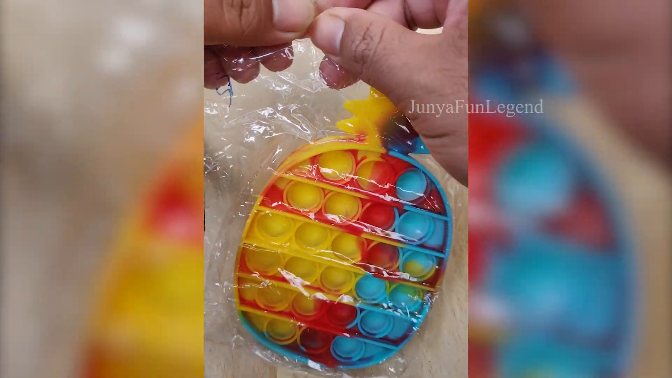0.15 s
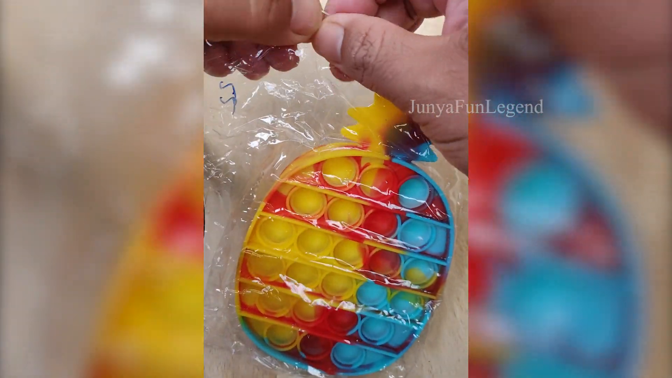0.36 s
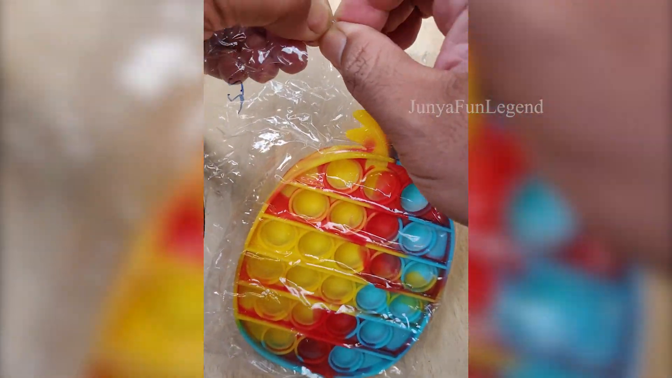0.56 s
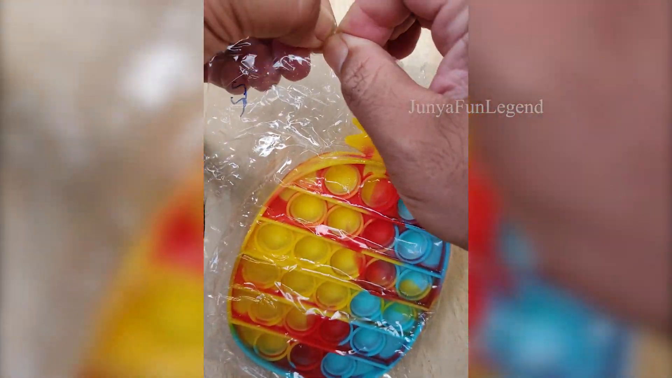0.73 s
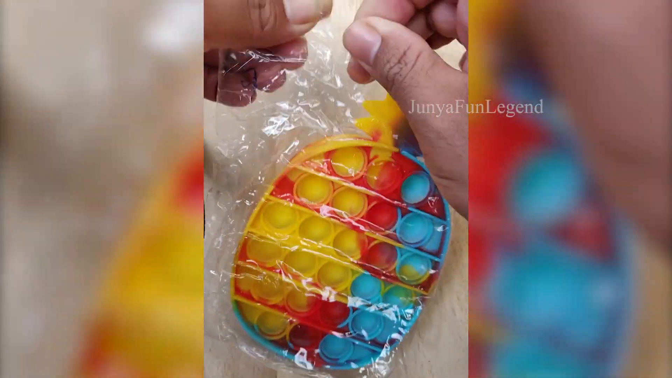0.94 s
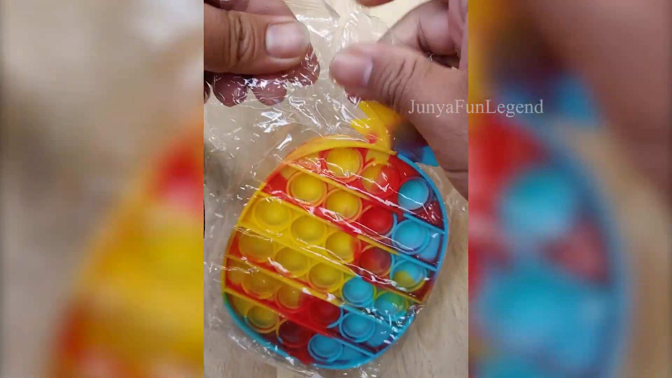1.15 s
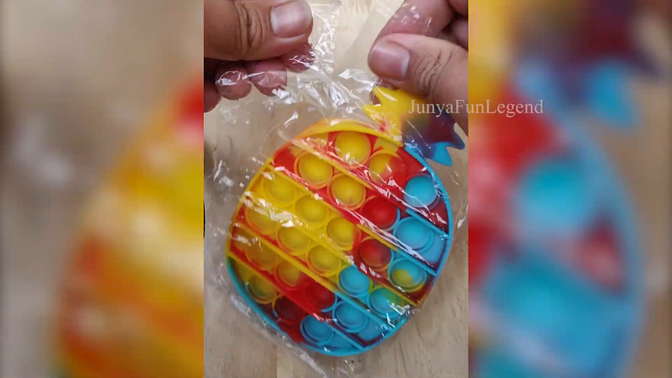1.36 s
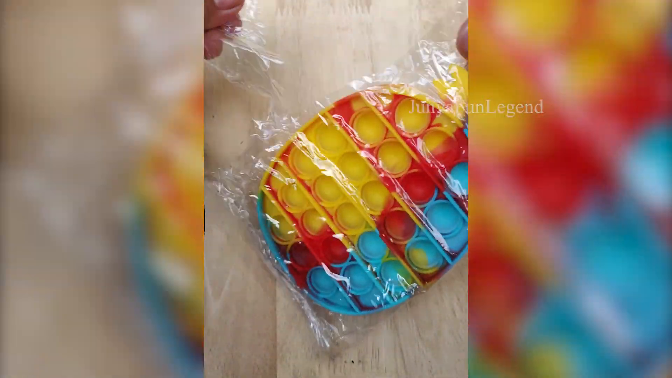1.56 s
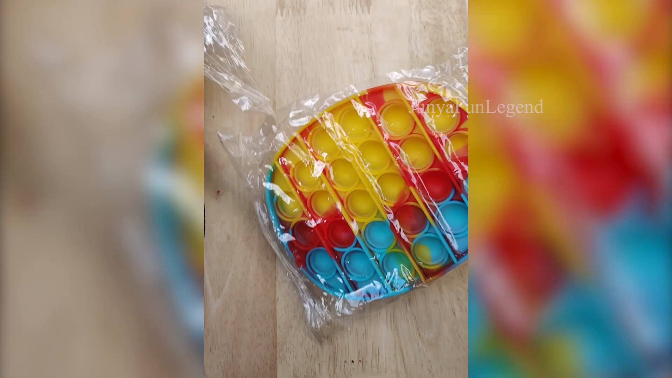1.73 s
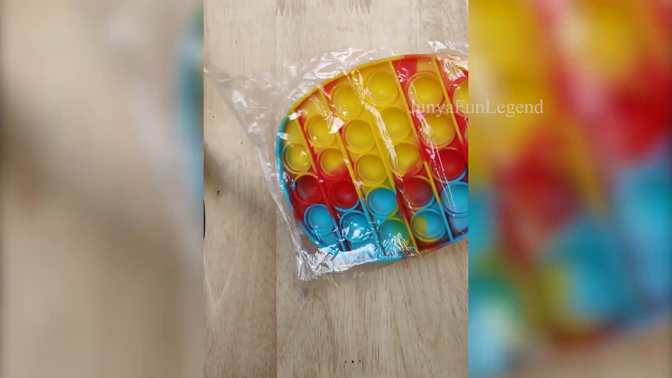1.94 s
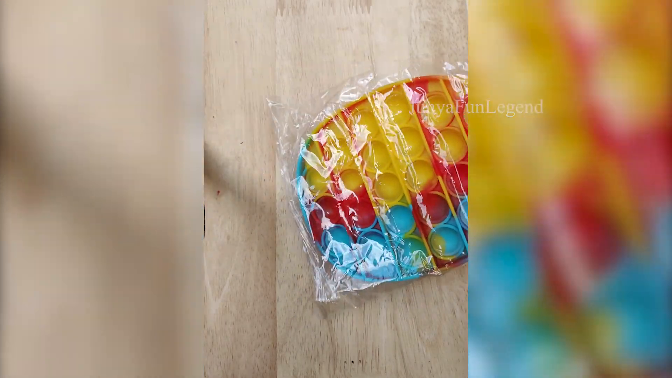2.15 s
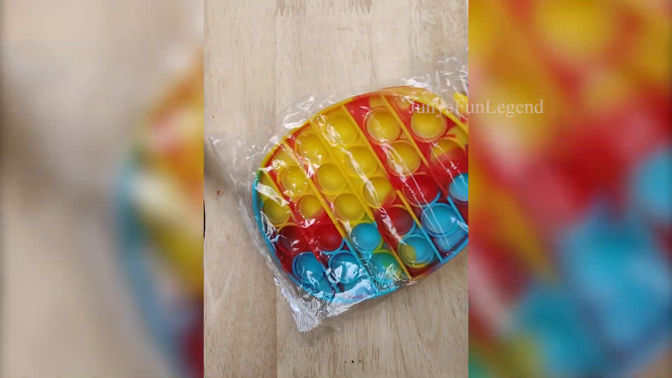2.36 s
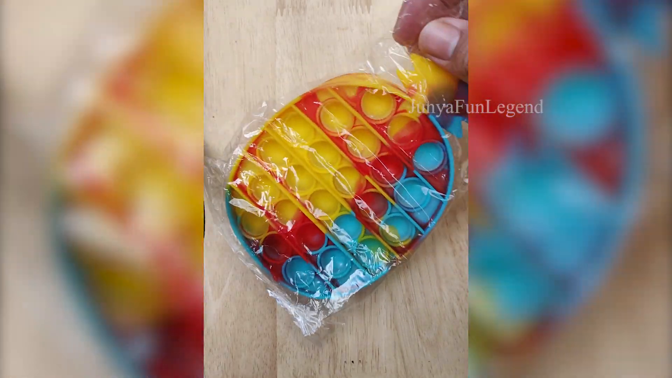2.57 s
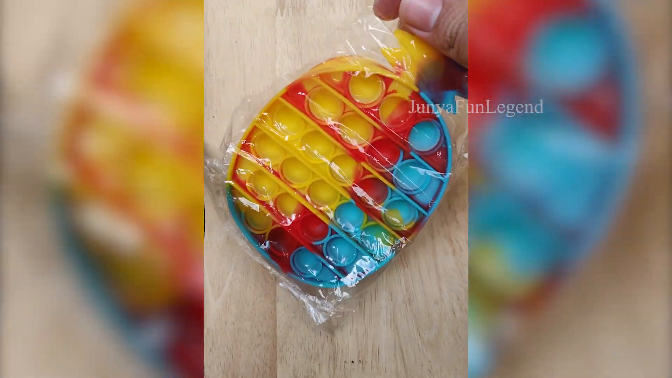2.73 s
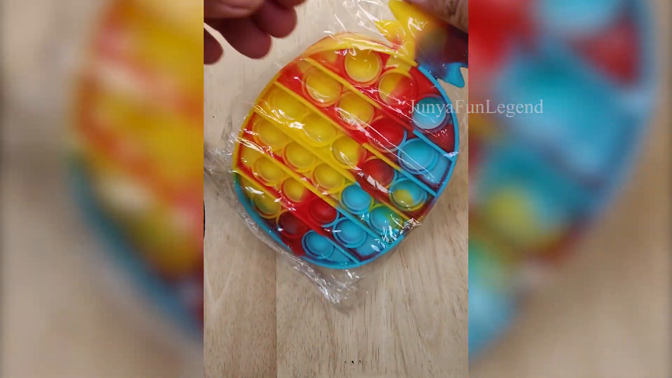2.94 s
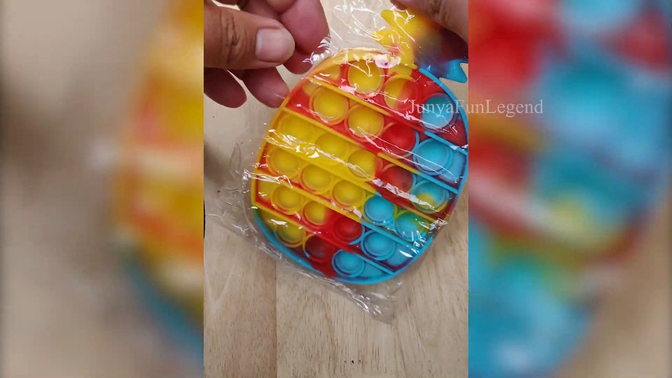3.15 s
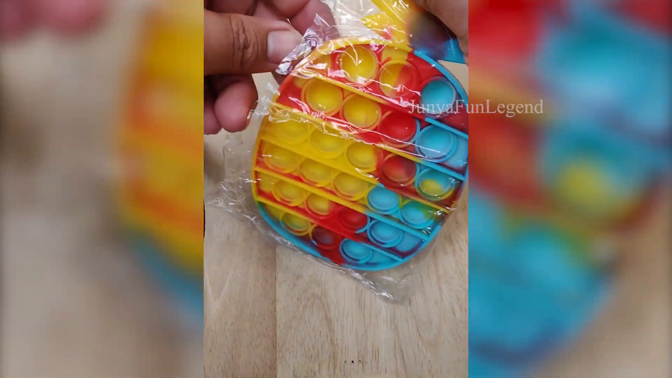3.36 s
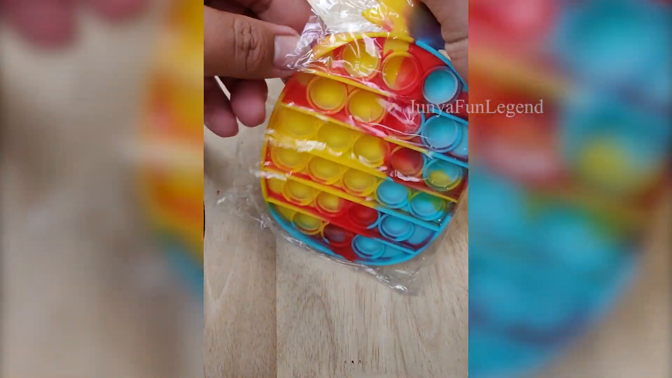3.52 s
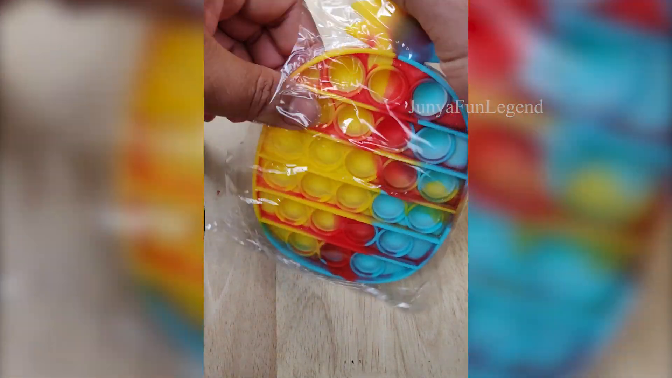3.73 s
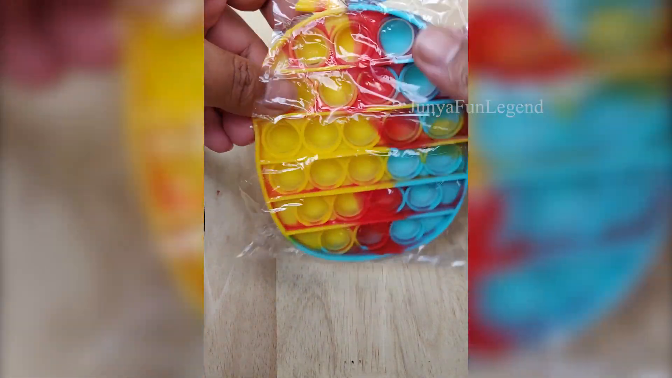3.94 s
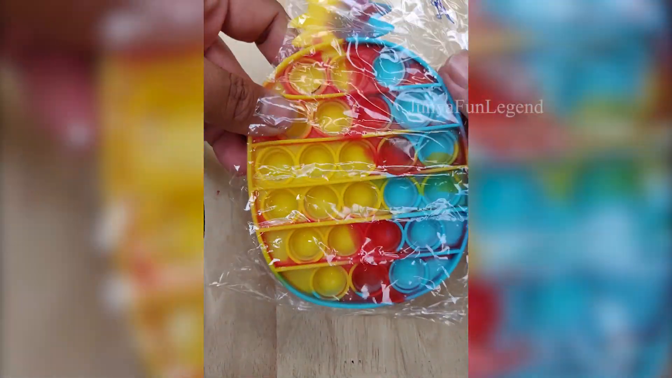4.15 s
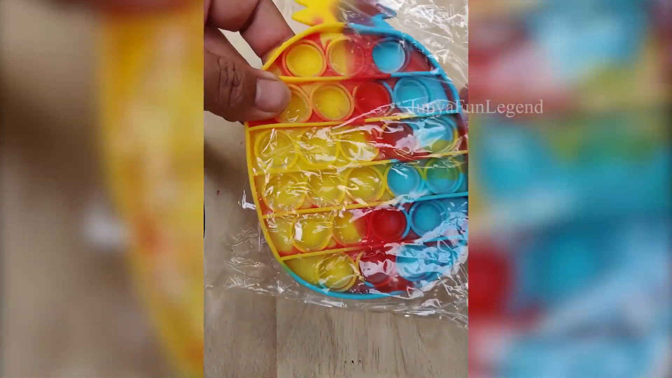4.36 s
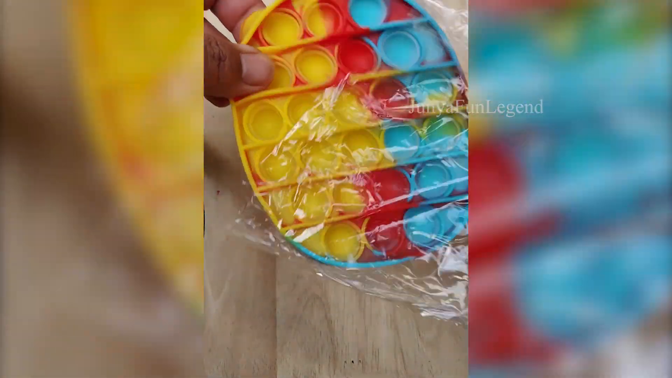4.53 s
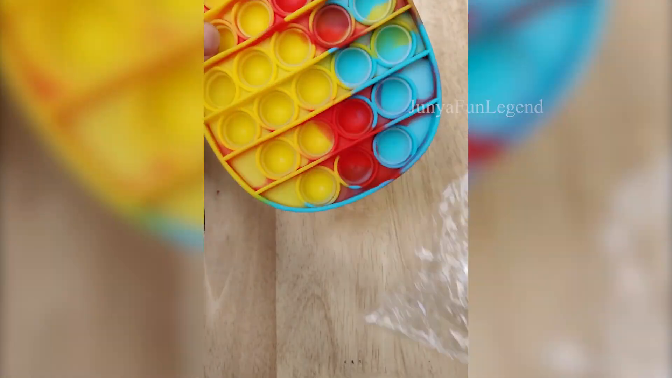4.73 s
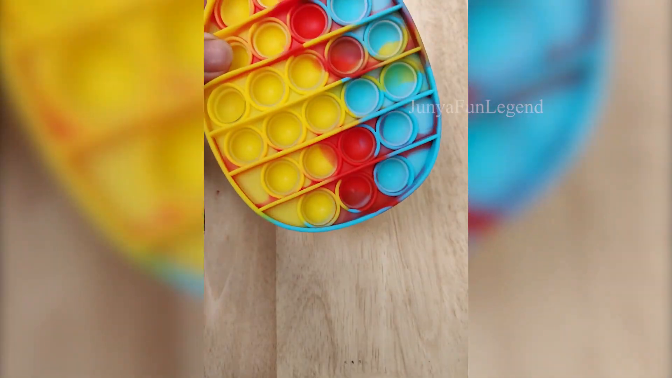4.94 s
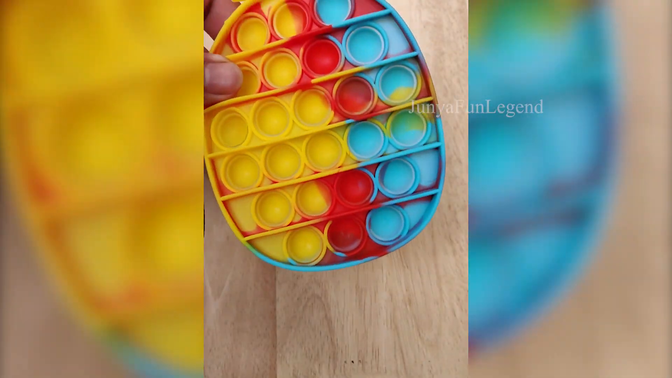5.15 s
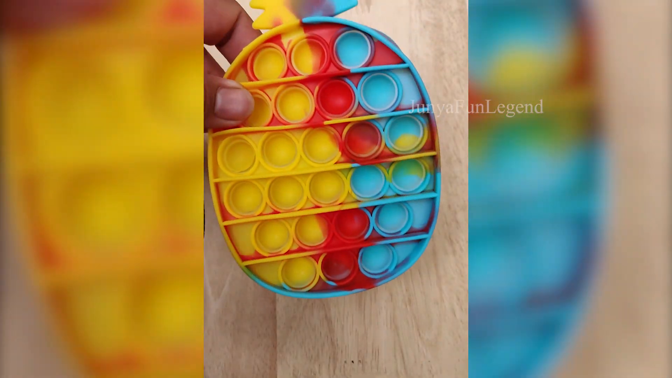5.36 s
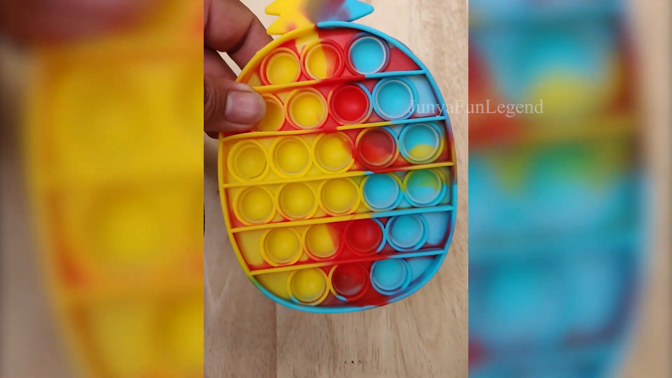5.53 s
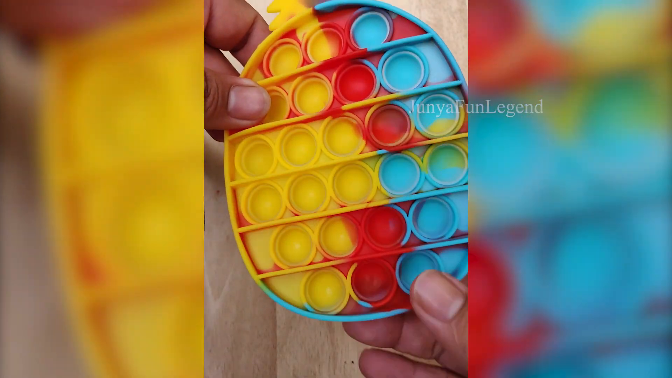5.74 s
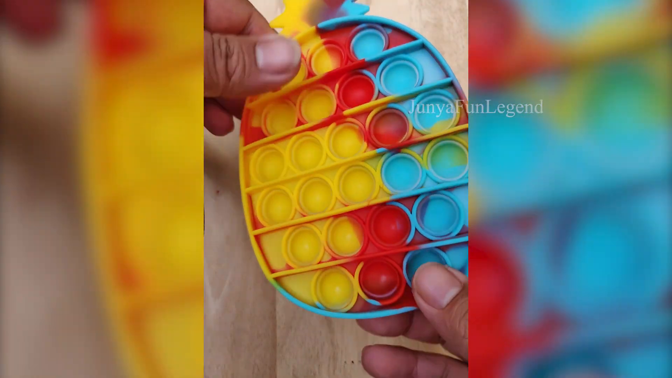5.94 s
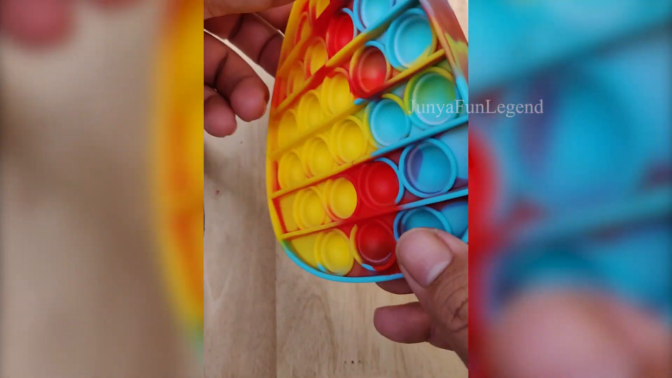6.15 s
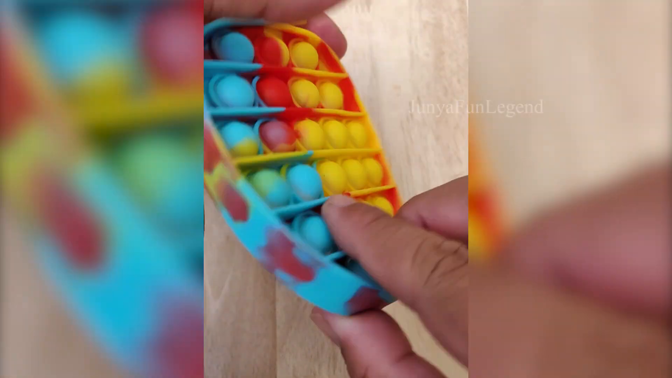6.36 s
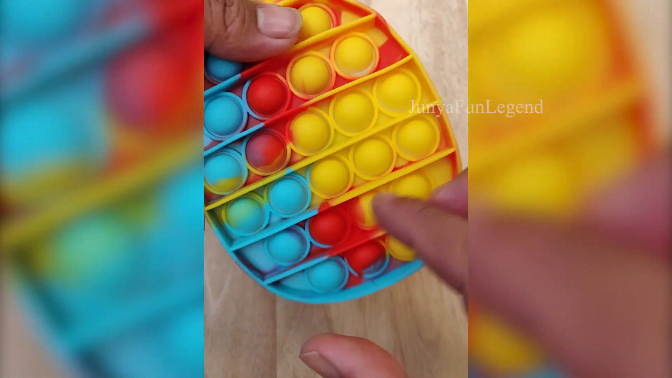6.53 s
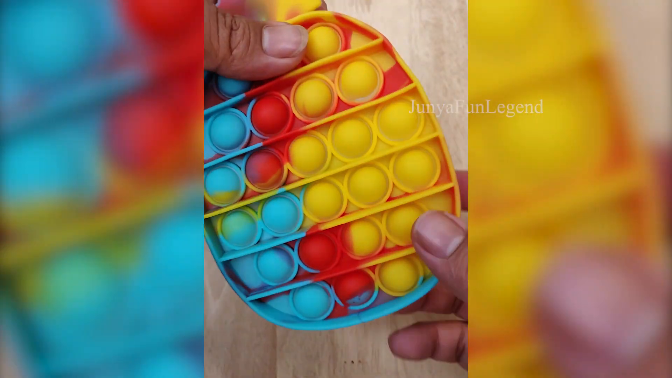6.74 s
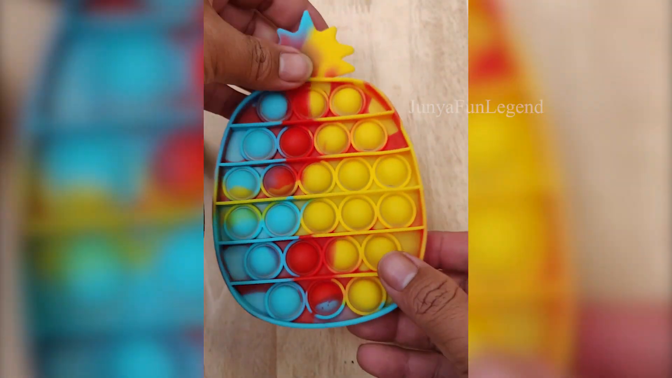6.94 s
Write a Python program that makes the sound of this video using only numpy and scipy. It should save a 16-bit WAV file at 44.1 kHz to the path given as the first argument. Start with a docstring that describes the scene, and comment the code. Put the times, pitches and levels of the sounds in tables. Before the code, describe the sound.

Close stereo pickup in a small, short-tailed room, over wavering low rumble, a barely audible hum and thin hiss. From 0 s thin plastic film snaps sharply, brightest in the first 0.3 s, then sparser until about 0.75 s. A low thud of the toy on the wooden table at 0.77 s starts a dense, loud crackle, peaking around 1.4 s and continuing to about 2 s. From 2.1 to 2.9 s the crinkles are lighter and scattered. A bump at 3.05 s brings renewed uneven bursts, with dull bumps near 3.6 s. Crackling swells from 4.2 to 4.7 s, with thuds around 4.5-4.65 s as the wrapper comes off, then drops to small crackles ending near 5.3 s. Afterwards, quiet: airy finger slides over silicone at 5.35-5.75 s and 6.2-6.8 s, faint hollow knocks and ticks around 5.83, 6.6 and 6.9 s.

```python
"""Hands crumple a thin plastic wrapper and pull it off a silicone bubble toy on a wooden table, close to a phone.
From the start a low rumble, a faint hum and a thin hiss, all shaped noise, lie under the scene; the film crackles
densely and buckles in sharp snaps, short noise bursts in three parts, and a small room answers with a diffuse tail.
Soon the toy bumps the table, a push of noise in a broad resonance; from about 5.3 s fingertips knock the hollow
bubbles in the same way, slide over the silicone in gliding bands of noise and tick on it in bursts like the snaps."""
import sys
import numpy as np
from scipy import signal
from scipy.fft import rfft, irfft
from scipy.io import wavfile
from scipy.ndimage import uniform_filter1d

SR = 44100
rng = np.random.default_rng(int(sys.argv[2]) if len(sys.argv) > 2 else 0)


def amp(db):
    return 10 ** (np.asarray(db, float) / 20)


def write(x):
    x = np.atleast_2d(x).T
    wavfile.write(sys.argv[1], SR, np.round(np.clip(x, -1, 1) * 32767).astype(np.int16))


N = 308259
TIME = np.arange(N) / SR

# the crisp, middle and hollow part of a buckle: (low edge [Hz], high edge [Hz], t60 [s],
# likeness of the two ports [0-1], lead of the left port [s])
BUCKLE_PARTS = [(3570, 14100, 0.0056, 0.03, 0.00058), (1740, 5060, 0.026, 0, 0.00024),
                (280, 2300, 0.018, 0.83, 0.00013)]
# where the hands work: (time [s], left minus right [dB])
HANDS_PAN = [(0, 4.5), (4.7, 6.5), (4.95, -3), (5.9, -4.5), (6.2, 2)]


def pan_gain(pan_db):
    """Left and right gain for a left-minus-right difference in dB, shared evenly."""
    return amp(np.array([pan_db, -pan_db]) / 2)


def points(table, hz):
    """Level in dB of a (frequency [Hz], level [dB]) table, straight on a log axis."""
    f, db = np.transpose(table)
    return np.interp(np.log(hz + 1), np.log(f), db)


def coloured(table):
    """Steady noise with the colour of a table, rms 1."""
    hz = np.arange(N // 2 + 1) * SR / N
    x = irfft(rfft(rng.standard_normal(N)) * amp(points(table, hz)), N)
    return x / x.std()


def walk(rate):
    """Random levels held 1 / rate seconds and slewed; spread 1."""
    hold = int(SR / rate)
    steps = np.repeat(rng.standard_normal(N // hold + 1), hold)
    x = uniform_filter1d(steps, hold)[:N]
    return x / x.std()


def band(x, hz, width):
    """One resonance."""
    return signal.lfilter(*signal.iirpeak(hz, hz / width, fs=SR), x)


def fade(t60, size=1024):
    """Exponential dying away, down 60 dB after t60 seconds."""
    return np.exp(-np.log(1000) * np.arange(size) / SR / t60)


def pair(shape, alike):
    """Two noises with a common share, one for each port."""
    alike = np.clip(alike, 0, 1)
    common, left, right = rng.standard_normal((*shape[:-1], 3, shape[-1])).swapaxes(0, -2)
    return np.sqrt(alike) * common + np.sqrt(1 - alike) * np.array([left, right])


def add(out, times, bursts):
    """Lay bursts (ports, events, samples) onto the track."""
    for k, s in enumerate(times):
        i = int(s * SR)
        out[:, i:i + bursts.shape[-1]] += bursts[:, k, :N - i]


def response(table, lo_hz, hi_hz, size=1024):
    """Causal (minimum-phase) response with the colour of a table inside a band, energy 1."""
    hz = np.arange(size // 2 + 1) * SR / size + 1
    edges = 1 / np.sqrt((1 + (lo_hz / hz) ** 8) * (1 + (hz / hi_hz) ** 8))
    cepstrum = irfft(np.log(amp(points(table, hz)) * edges))
    # folding the cepstrum forward in time makes the response causal
    cepstrum[1:size // 2] *= 2
    cepstrum[size // 2 + 1:] = 0
    taps = irfft(np.exp(rfft(cepstrum)))[:size // 2]
    return taps / np.sqrt(np.sum(taps ** 2))


def ports(x, lo_hz, hi_hz, lead_s):
    """Each microphone port colours the sound in its own way, the right one hears it later."""
    # colour of a buckle at each port: (frequency [Hz], relative level [dB])
    left_colour = [(150, -18.5), (330, -22), (780, -12), (1900, -15), (3300, -14.5), (4700, -10),
                   (6000, 0.5), (7400, -11.5), (8700, -26), (9400, -31), (10400, -57), (12000, -34),
                   (15600, -25)]
    right_colour = [(150, -6.5), (330, -32), (780, -11), (1900, -19.5), (3300, -18.5), (4700, -16.5),
                    (6000, -12.5), (7400, -14), (8700, -7), (9400, -10), (10400, -32), (12000, -27.5),
                    (15600, -15)]
    wait = np.zeros(round(lead_s * SR))
    early = np.r_[response(left_colour, lo_hz, hi_hz), wait]
    late = np.r_[wait, response(right_colour, lo_hz, hi_hz)]
    taps = np.array([early, late]).reshape(2, *[1] * (x.ndim - 2), -1)
    return signal.fftconvolve(x, taps, axes=-1)[..., :x.shape[-1]]


def pulse(t60, rise_s=.00015):
    """Power of one buckle: a quick rise, then dying away."""
    return (fade(t60) * (1 - np.exp(-np.arange(1024) / SR / rise_s))) ** 2


def crease(x, lo_hz, hi_hz, lift_db=9.5, spread_octaves=.3):
    """Every crease has its own size and lifts one resonance of its own."""
    hz = np.arange(x.shape[-1] // 2 + 1) * SR / x.shape[-1] + 1
    centre = lo_hz * (hi_hz / lo_hz) ** rng.random((x.shape[-2], 1))
    octaves = np.log2(hz / centre)
    return irfft(rfft(x) * amp(lift_db * np.exp(-(octaves / spread_octaves) ** 2)))


def buckles(table, size=4096, count=256):
    """Milliseconds of noise: a faint short noise swells in just before, a dying run of smaller ones follows."""
    swell_in_db, swell_in_s = -20, .003
    run_db, run_per_s = -9, 600
    scatter_db, spread_floor = 8.5, .2
    pan_scatter_db, crease_top_hz = 3, 8000

    s, peak_db, middle_db, hollow_db, run_t60 = np.transpose(table)
    pan_db = np.interp(s, *np.transpose(HANDS_PAN)) + pan_scatter_db * rng.standard_normal(len(s))
    share = pan_gain(pan_db)
    share /= np.sqrt(np.mean(share ** 2, axis=0))

    # sizes sample by sample, with the main buckle at sample number count
    when, spread = rng.random((len(s), 2, size)).swapaxes(0, 1)
    before = amp(swell_in_db) * np.exp(np.arange(-count, 0) / SR / swell_in_s) * np.ones((len(s), 1))
    after = amp(run_db) * fade(run_t60[:, None], size=size - count)
    scatter = amp(-scatter_db * np.log(spread + spread_floor))
    sizes = (when < run_per_s / SR) * scatter * np.c_[before, after]
    sizes[:, count] = 1

    out = np.zeros((2, N))
    for (lo, hi, t60, alike, lead), db in zip(BUCKLE_PARTS, (peak_db, middle_db, hollow_db)):
        swell = np.sqrt(np.abs(signal.fftconvolve(sizes ** 2, pulse(t60)[None])[:, :size]))
        noise = crease(pair(sizes.shape, alike), lo, min(hi, crease_top_hz))
        bursts = ports(noise * swell, lo, hi, lead)
        # the main buckle sets the peak
        bursts /= np.abs(bursts[..., count:count + round(t60 * SR)]).max(axis=-1, keepdims=True)
        add(out, np.maximum(s - count / SR, 0), bursts * (amp(db) * share)[..., None])
    return out


def blows(table, breadth, rise_s, pan_db, size=8192):
    """A soft push: a short swell of noise in one resonance, as broad as breadth times its frequency."""
    s, db, hz, t60 = np.transpose(table)
    noise = pair((len(s), size), .8)
    rings = [band(band(noise[:, k], f, breadth * f), f, breadth * f) for k, f in enumerate(hz)]
    ring = np.stack(rings, axis=1)
    ring *= fade(t60[:, None], size=size) * (1 - np.exp(-np.arange(size) / SR / rise_s))
    ring *= amp(db)[:, None] / np.abs(ring).max(axis=(0, 2), keepdims=True)
    out = np.zeros((2, N))
    add(out, s, ring * pan_gain(pan_db)[:, None, None])
    return out


def rumble():
    """Low noise of wavering level, partly common to both ports."""
    # colour of the rumble: (frequency [Hz], relative level [dB])
    rumble_colour = [(12, -28.5), (20, 0), (60, -4.5), (121, -19), (163, -39), (274, -29.5), (353, -45.5),
                     (416, -25.5), (544, -76.5), (700, -51.5), (910, -56), (2200, -61), (3000, -120)]
    # its course: (time [s], level of the common share [dB], left minus right [dB])
    rumble_course = [(0.0, -49.5, 1), (0.68, -49, 10.5), (1.21, -55.5, 11.5), (1.36, -55.5, 19),
                     (1.87, -51.5, -1), (2.82, -52, -0.5), (3.0, -53.5, 3.5), (3.87, -49, 2.5),
                     (5.45, -54.5, -0.5), (6.99, -53.5, 1.5)]
    s, db, pan_db = np.transpose(rumble_course)
    db, pan_db = np.interp(TIME, s, db), np.interp(TIME, s, pan_db)
    # the more one-sided the rumble, the less alike at the two ports
    own = .2 + 0.12 * np.abs(pan_db)
    sides = np.array([coloured(rumble_colour), coloured(rumble_colour)])
    return (coloured(rumble_colour) + own * sides) * amp(db) * pan_gain(pan_db)


def hum():
    """A faint hum: noise through the same narrow resonance twice, equal at both ports."""
    hz, width_hz, level_db = 424, 40, -90.5
    x = band(band(rng.standard_normal(N), hz, width_hz), hz, width_hz)
    return x / x.std() * amp(level_db)


def hiss(count=24):
    """A thin hiss, built of narrow noise bands with random levels."""
    # colour of the hiss, band by band: (frequency [Hz], relative level [dB])
    hiss_colour = [(1500, -38.5), (3500, -13), (5500, -3), (7000, -1), (9500, -11), (12000, -21),
                   (15500, -28)]
    # weight of each port, before the bass is cut: (left [dB], right [dB])
    hiss_sides = (-65.5, -60)
    out = 0
    for hz in np.geomspace(2300, 15000, count):
        bands = band(band(rng.standard_normal((2, N)), hz, .09 * hz), hz, .09 * hz)
        random_db = 1.8 * np.array([walk(18.0), walk(11.0)])
        out = out + bands * amp(points(hiss_colour, hz) + random_db)
    return out / out.std() * amp(np.array(hiss_sides))[:, None]


def crumple(count=4):
    """Countless small buckles of very unequal size: sparse and bunched at rest, dense when the hands pull."""
    # pull of the hands on the film: (time [s], crisp crackle [dB], hollow part re crackle [dB])
    pull = [(0, -24.5, -9.5), (.1, -42, -6), (0.502, -43, -18.5), (.75, -53, -11), (0.801, -23.5, -6),
            (0.901, -19.5, -12), (1.13, -29, -6.5), (1.429, -12, -12.5), (1.619, -21, -16.5),
            (1.892, -27.5, -27), (2.029, -19.5, -8), (2.09, -40.5, -12), (2.2, -39, -16), (2.3, -31.5, -10),
            (2.701, -43.5, -23.5), (2.969, -42.5, -33), (3.048, -21.5, -3), (3.172, -45.5, -7.5),
            (3.318, -23, -8), (3.468, -34, -11.5), (3.73, -21, -12.5), (3.9, -38.5, -9), (4.02, -32, -13.5),
            (4.209, -24.5, -22.5), (4.38, -16.5, -10), (4.54, -13, -7), (4.66, -20.5, -12),
            (4.721, -55.5, -21.5), (4.859, -30, -15), (5.128, -35.5, -28), (5.261, -58.5, -10),
            (5.34, -87, 2.5)]
    calm_per_s, busy_per_s = 210.0, 1100.0
    bunching_db, scatter_db, colour_db = 2.5, 3.5, 8.0

    s, crisp_db, hollow_db = np.transpose(pull)
    middle_db = 0.74 * crisp_db - 9.5 + 0.24 * hollow_db
    columns = crisp_db, middle_db, crisp_db + hollow_db
    effort = np.clip((np.interp(TIME, s, crisp_db) + 48) / 28, 0, 1)
    per_s = calm_per_s * (busy_per_s / calm_per_s) ** effort
    bunching = bunching_db * (1 - 0.39 * effort) * walk(45.)
    scatter = -scatter_db * np.log(rng.random(N) + 0.094)
    # the root keeps the power from growing with the density
    sizes = (rng.random(N) < per_s / SR) * amp(bunching + scatter) * np.sqrt(SR / per_s)

    out = 0
    for (lo, hi, t60, alike, lead), db in zip(BUCKLE_PARTS, columns):
        part = 0
        # creases differ in size, so each buckle favours other resonances, and neighbours in time are akin
        for hz in np.geomspace(lo, hi, count + 2)[1:-1]:
            favour = 0.53 * rng.standard_normal(N) + 0.38 * walk(30.)
            own = sizes * amp(colour_db * favour)
            swell = np.sqrt(np.abs(signal.fftconvolve(own ** 2, pulse(t60))[:N]))
            part = part + band(pair((N,), alike) * swell, hz, 0.73 * hz)
        part = ports(part, lo, hi, lead)
        # silent after the last row of the table
        out = out + part / part.std() * amp(np.interp(TIME, s, db, right=-150))
    return out * pan_gain(np.interp(TIME, *np.transpose(HANDS_PAN)))


def snaps():
    """The clearest single buckles of the film, each with its run of smaller ones."""
    # peaks before panning: (time [s], crisp part [dB], middle part [dB], hollow part [dB],
    # t60 of the run of smaller buckles that follows [s])
    film_snaps = [(0.0054, -10, -23, -27.5, 0.035), (0.023, -8, -14, -26, 0.099),
                  (0.0418, 1, -18, -14.5, 0.073), (0.0668, -3, -18, -29, 0.026),
                  (0.076, -8, -14, -17.5, 0.019), (0.114, -22, -33, -54, 0.035),
                  (0.1438, -2, -18.5, -31.5, 0.018), (0.1587, -14, -38, -31, 0.035),
                  (0.176, -14, -36, -32, 0.025), (0.1983, -2, -22, -29.5, 0.016),
                  (0.227, -15, -37, -56, 0.018), (0.2577, -9, -24, -39, 0.027),
                  (0.2909, -13.5, -31, -61, 0.035), (0.3237, -21, -41, -56, 0.014),
                  (0.3451, -13, -21, -41, 0.053), (0.3562, -6, -21.5, -59, 0.016),
                  (0.4, -21, -36, -63, 0.054), (0.4083, -11.5, -29, -61, 0.087),
                  (0.4815, -4, -14, -21.5, 0.022), (0.4984, -30.5, -35, -26, 0.012),
                  (0.538, -8, -22, -46, 0.013), (0.5674, -17, -46, -57, 0.035),
                  (0.601, -24.5, -40, -64, 0.035), (0.622, -15, -37, -50, 0.11),
                  (0.6579, -10.5, -26, -39.5, 0.035), (0.6682, -15, -17.5, -26, 0.11),
                  (0.7174, -6.5, -50, -32, 0.013), (0.7657, -1.5, -14, -5.5, 0.023),
                  (0.7825, -3.5, -34, -42, 0.027), (0.8099, -1.5, -34, -28, 0.041),
                  (0.823, -10, -15, -15.5, 0.035), (0.836, -1, -23, -22, 0.065),
                  (0.8462, 0, -36.5, -30.5, 0.084), (0.8779, -6.5, -23, -34.5, 0.022),
                  (0.9032, -4, -5.5, -14.5, 0.058), (0.9184, -2.5, -5.5, -21, 0.11),
                  (0.947, -4, -29, -40, 0.017), (0.9964, -6, -33, -38, 0.032),
                  (1.0113, -3.5, -40, -12.5, 0.022), (1.0447, -5, -31, -54, 0.096),
                  (1.0539, 3.5, -18, -26, 0.089), (1.0711, 5.5, -20, -25, 0.041),
                  (1.0824, -2, -24, -9.5, 0.035), (1.103, 1, -34, -42, 0.013),
                  (1.1377, -8.5, -23, -30, 0.03), (1.1452, 1.5, -33, -41, 0.026),
                  (1.1635, -9.5, -33, -26, 0.048), (1.2055, -3.5, -12, -16.5, 0.11),
                  (1.2596, 0, -33, -26.5, 0.042), (1.2683, -9, -33, -12, 0.037),
                  (1.285, -6.5, -39, -32, 0.061), (1.294, -12, -34.5, -23, 0.035),
                  (1.3733, -0.5, -22, -12, 0.063), (1.4023, 0.5, -31.5, -17.5, 0.035),
                  (1.604, 2.5, -18, -14, 0.045), (1.6364, -5.5, -25, -23, 0.026),
                  (1.7073, -8, -37, -50, 0.097), (1.7483, -1, -40, -47, 0.035),
                  (1.8028, -4, -20, -37, 0.021), (1.8148, -2.5, -32, -32, 0.02),
                  (1.8482, -16, -13.5, -48, 0.017), (1.8845, -3.5, -24, -43, 0.035),
                  (1.9072, -4.5, -27, -40, 0.11), (1.943, -6.5, -15.5, -21, 0.072),
                  (1.9727, -9.5, -22, -44, 0.1), (1.9913, -6.5, -36, -50, 0.084),
                  (2.0088, -5, -31, -31, 0.035), (2.0195, 0.5, -27, -36, 0.035),
                  (2.0695, -13, -21, -31, 0.035), (2.1276, -14.5, -44, -31.5, 0.043),
                  (2.145, -25, -21, -27.5, 0.035), (2.17, -7.5, -45, -55, 0.018),
                  (2.2298, -9.5, -31, -30.5, 0.06), (2.2404, -24, -26.5, -36, 0.035),
                  (2.2826, -8, -25, -34, 0.086), (2.3573, -20, -29, -25.5, 0.032),
                  (2.369, -14, -13, -47, 0.02), (2.3871, -19.5, -17, -33, 0.023),
                  (2.4104, -9.5, -23, -41, 0.046), (2.4327, -13.5, -29, -34, 0.11),
                  (2.4908, -15, -35, -45, 0.035), (2.575, -5, -21, -60, 0.03),
                  (2.591, -18, -26, -64, 0.035), (2.6177, -6.5, -19, -30, 0.022),
                  (2.673, -15, -24.5, -47, 0.057), (2.7357, -13, -19, -32, 0.067),
                  (2.786, -3, -26, -30.5, 0.042), (2.8243, -6.5, -15, -24, 0.033),
                  (2.883, -14, -30, -43, 0.065), (2.9452, -6, -51, -70, 0.024),
                  (2.9642, -19, -34, -66, 0.047), (3.0089, -5.5, -11, -44, 0.035),
                  (3.0265, -13, -7.5, -14.5, 0.1), (3.0348, -10, -5.5, -15, 0.1),
                  (3.0507, -1, -47, -44, 0.035), (3.076, -19.5, -18, -42.5, 0.026),
                  (3.101, -7, -34, -38, 0.05), (3.1436, -12, -29, -34, 0.035),
                  (3.1813, -5.5, -25, -37, 0.033), (3.236, -7, -24, -33, 0.056),
                  (3.259, -8.5, -20, -34, 0.035), (3.3344, -4.5, -10.5, -26, 0.03),
                  (3.4014, -4.5, -31, -57, 0.043), (3.4134, -8.5, -35, -48, 0.03),
                  (3.4366, -8.5, -21, -49, 0.08), (3.4458, -3, -12.5, -26, 0.058),
                  (3.4955, -7.5, -27, -36, 0.086), (3.5245, -8.5, -18, -28, 0.074),
                  (3.5591, 0.5, -5.5, -19.5, 0.071), (3.573, -12, -34, -31, 0.044),
                  (3.6093, -8.5, -19, -36, 0.04), (3.6436, -8, -26, -27, 0.021),
                  (3.6624, -0.5, -15, -18.5, 0.037), (3.6907, -1.5, -24, -37, 0.025),
                  (3.7504, -3, -7, -22, 0.03), (3.7854, -3.5, -14, -16.5, 0.11),
                  (3.846, -5, -32, -21, 0.013), (3.87, -2.5, -33, -47, 0.014),
                  (3.903, -3, -13.5, -26, 0.012), (3.9174, -5, -28, -37, 0.012),
                  (3.937, 0, -20, -24.5, 0.013), (3.9936, -1, -10.5, -17, 0.11),
                  (4.028, -4, -16, -33, 0.066), (4.0537, -12, -34.5, -46, 0.035),
                  (4.0689, -4.5, -10.5, -44, 0.051), (4.1229, -2.5, -30, -24, 0.035),
                  (4.1375, 1, -17, -15.5, 0.1), (4.15, -5.5, -29, -42, 0.035),
                  (4.2158, -24, -43.5, -47, 0.031), (4.2388, 0, -29, -22, 0.052),
                  (4.2524, -6, -8.5, -12.5, 0.061), (4.2788, -1, -22, -13.5, 0.035),
                  (4.2996, 0.5, -3, -30, 0.11), (4.3864, -4, -21, -14, 0.092),
                  (4.5003, -3, -33, -27, 0.035), (4.5894, -11, -24.5, -11, 0.051),
                  (4.616, -8, -26, -25, 0.035), (4.6715, -3, -7, -15.5, 0.025),
                  (4.6992, 1, -13.5, -39, 0.018), (4.7431, -18, -24, -58, 0.031),
                  (4.793, -17, -19.5, -49, 0.029), (4.8189, -21, -37, -51, 0.035),
                  (4.8349, -11.5, -30, -30, 0.03), (4.8628, -12.5, -42, -42, 0.027),
                  (4.9602, -9, -41, -22.5, 0.026), (5.0055, -15, -41, -30, 0.035),
                  (5.015, -8.5, -28.5, -37, 0.035), (5.0764, -15.5, -44, -47, 0.018),
                  (5.1084, -14.5, -38, -53, 0.029), (5.1723, -16.5, -48, -40, 0.078),
                  (5.2226, -15.5, -43, -62, 0.0355), (5.2504, -19.5, -57, -57, 0.012),
                  (5.2687, -19.5, -57, -40.5, 0.039)]
    return buckles(film_snaps)


def room(x):
    """A short diffuse tail of decaying noise, different at each port."""
    t60_s, level_db, delay_s = 0.085, -12, 0.012
    tail = rng.standard_normal((2, 16384)) * fade(t60_s, size=16384)
    tail[:, :round(delay_s * SR)] = 0
    tail *= amp(level_db) / np.sqrt(np.sum(tail ** 2, axis=1, keepdims=True))
    return x + signal.fftconvolve(x, tail, axes=1)[:, :N]


def bumps():
    """The toy bumps the table: low pushes in a very broad resonance."""
    # (time [s], peak before panning [dB], resonance [Hz], t60 of the fade [s])
    toy_bumps = [(0.526, -50, 50, 0.12), (0.764, -23.5, 174, 0.18), (0.80, -36.5, 80, 0.58),
                 (1.355, -34, 85, 0.2), (1.409, -40, 200, 0.065), (2.038, -38, 170, 0.15),
                 (2.37, -38, 260, 0.12), (3.051, -25, 280, 0.21), (3.557, -32, 201, 0.061),
                 (3.651, -32.5, 245, 0.2), (4.51, -27.5, 96, 0.29), (4.579, -28, 190, 0.15),
                 (4.639, -27, 300, 0.2), (5.017, -39.5, 168, 0.078), (5.269, -44, 300, 0.061),
                 (6.451, -60.5, 240, 0.11), (6.555, -66, 200, 0.1), (6.915, -46.5, 228, 0.17)]
    return blows(toy_bumps, breadth=1.1, rise_s=0.0026, pan_db=1.2)


def knocks():
    """Fingertips knock the hollow bubbles: quicker pushes in a narrower resonance."""
    # (time [s], peak before panning [dB], resonance [Hz], t60 of the fade [s])
    bubble_knocks = [(5.268, -45, 456, 0.021), (5.739, -52, 840, 0.063), (5.83, -42.5, 1800, 0.045),
                     (5.848, -62, 1727, 0.049), (6.399, -66, 1003, 0.062), (6.602, -47.5, 1410, 0.05),
                     (6.884, -61, 2060, 0.086), (6.905, -42.5, 597, 0.026), (6.914, -46, 546, 0.095),
                     (6.929, -53, 1140, 0.036), (6.944, -61, 660, 0.031)]
    return blows(bubble_knocks, breadth=0.21, rise_s=0.0013, pan_db=-0.83)


def rubs():
    """Fingers slide over the silicone: uneven bands of noise that swell in, glide and die away."""
    # (start [s], end [s], start frequency [Hz], end frequency [Hz], width [Hz], level before the swell [dB])
    slides = [(5.343, 5.59, 4760, 4800, 198, -47.5), (5.383, 5.744, 3960, 3580, 400, -44.5),
              (5.433, 5.688, 3250, 2930, 1183, -55.5), (5.824, 6.198, 2820, 2620, 587, -61),
              (6.23, 6.795, 3390, 3550, 353, -51.5), (6.271, 6.714, 3420, 3370, 2185, -56),
              (6.285, 6.648, 5920, 6500, 3370, -53), (6.653, 7.16, 3340, 3600, 700, -60),
              (6.878, 7.012, 5900, 6220, 4800, -49)]
    out = 0
    for start, end, start_hz, end_hz, width, db in slides:
        along = np.clip((TIME - start) / (end - start), 0, 1)
        phase = 2 * np.pi * np.cumsum(start_hz + (end_hz - start_hz) * along) / SR
        # low noise on a gliding carrier becomes a gliding band
        low = signal.butter(2, width / 2, fs=SR, output="sos")
        a, b = signal.sosfilt(low, rng.standard_normal((2, 2, N)))
        friction = (a * np.cos(phase) + b * np.sin(phase)) / a.std()
        swell = np.sin(np.pi * along ** 0.52) ** 1.53
        out = out + friction * swell * amp(db + 1.3 * walk(29.0))
    return out


def ticks():
    """Fingertips tick on the bare silicone: the same kind of burst as a snap of the film."""
    # peaks before panning: (time [s], crisp part [dB], middle part [dB], hollow part [dB],
    # t60 of the run of smaller ticks that follows [s])
    silicone_ticks = [(5.5223, -19, -42, -78, 0.028), (5.8202, -19, -42, -63.5, 0.037),
                      (5.8255, -34, -35, -49, 0.043), (5.8536, -27, -32, -67, 0.034),
                      (6.2477, -28.5, -56, -75.5, 0.031), (6.316, -15.5, -40, -80, 0.026),
                      (6.6024, -22.5, -45, -64, 0.029), (6.7715, -34, -63, -70, 0.04)]
    return buckles(silicone_ticks)


def scene():
    """Wrapper and toy in the room, over the background."""
    near = crumple() + snaps() + bumps() + knocks() + ticks()
    # light friction and hiss carry no body
    no_body = signal.butter(4, 2300, "high", fs=SR, output="sos")
    thin = signal.sosfilt(no_body, rubs() + hiss())
    return room(near) + thin + rumble() + hum()


def roll_off(x):
    """The treble ends steeply here."""
    return signal.sosfilt(signal.butter(12, 16390, fs=SR, output="sos"), x)


def record(dry):
    """Whatever exceeds full scale is clipped; the top is cut above 15750 Hz."""
    top = signal.ellip(8, .2, 60, 15750, fs=SR, output="sos")
    mix = signal.sosfilt(top, np.clip(dry, -1, 1))
    return roll_off(mix)


dry = scene()
out = record(dry)
write(out)
```